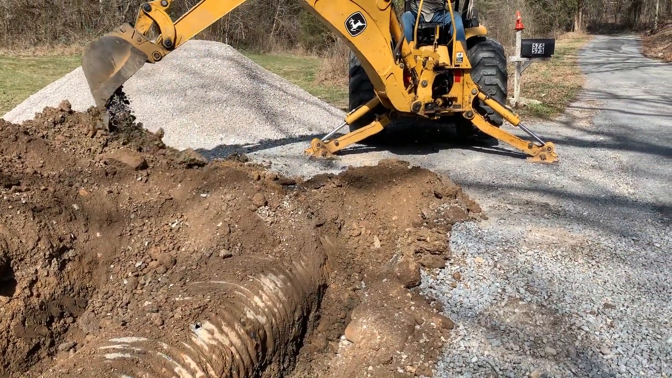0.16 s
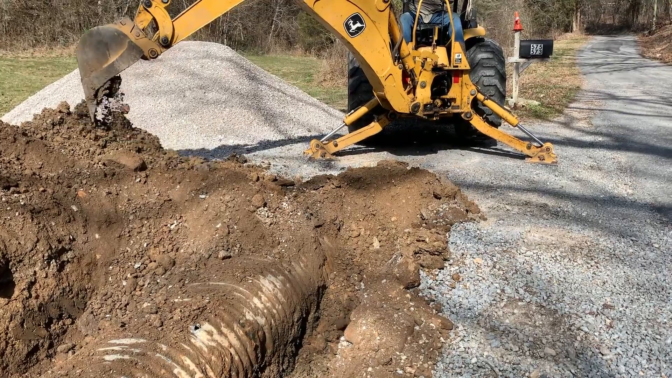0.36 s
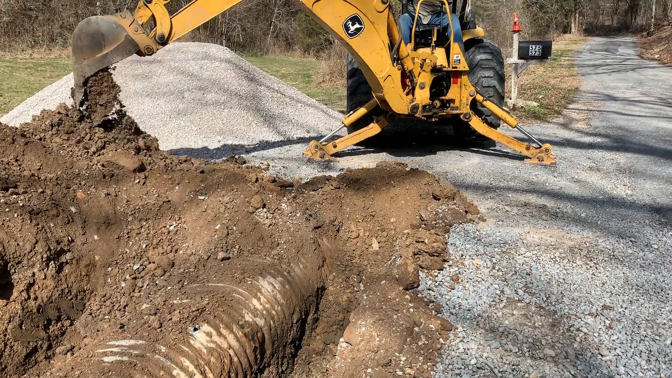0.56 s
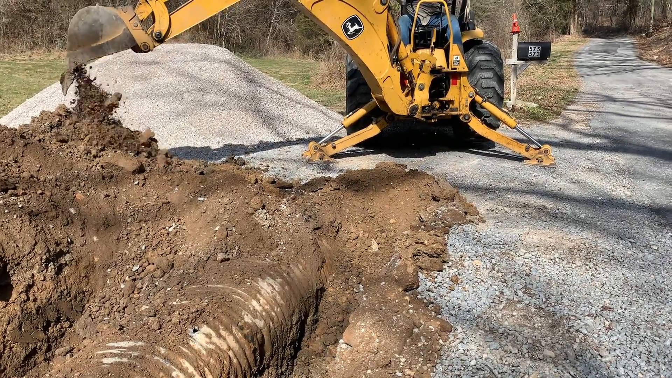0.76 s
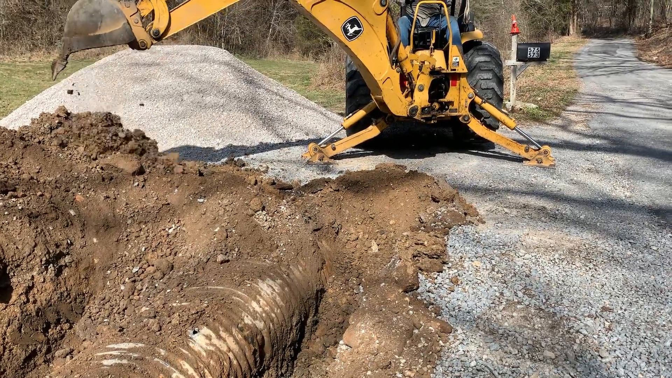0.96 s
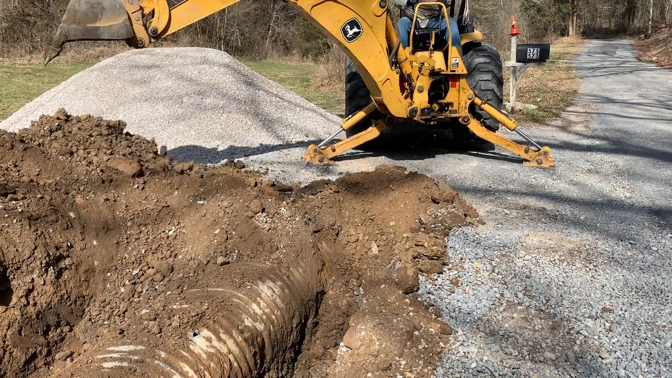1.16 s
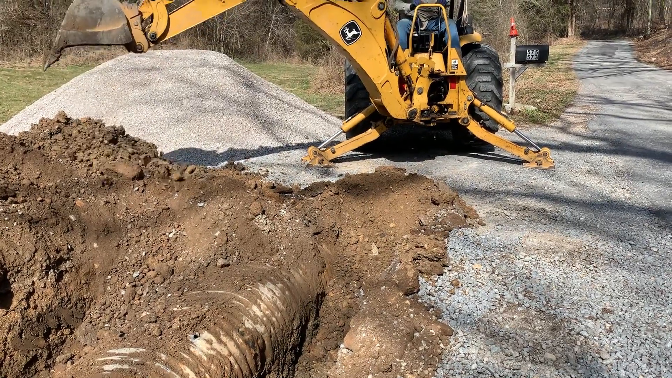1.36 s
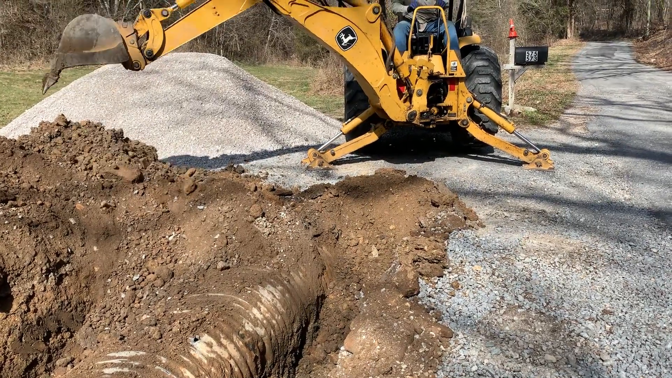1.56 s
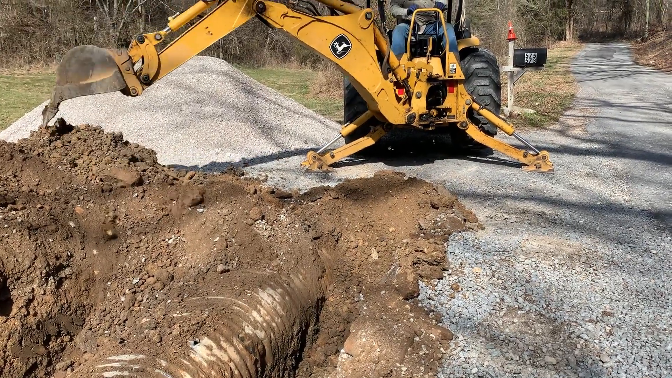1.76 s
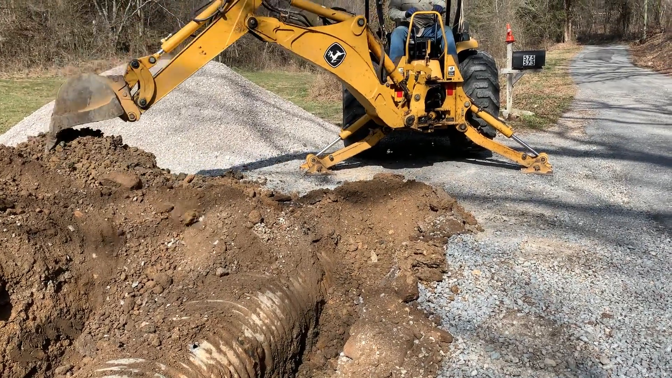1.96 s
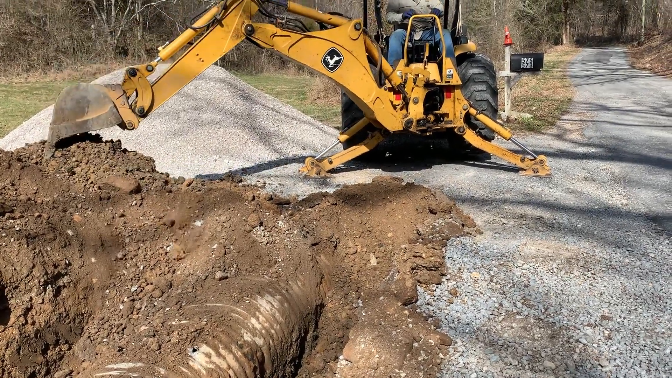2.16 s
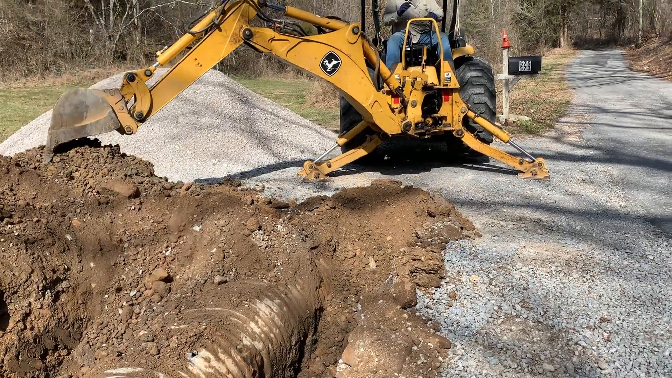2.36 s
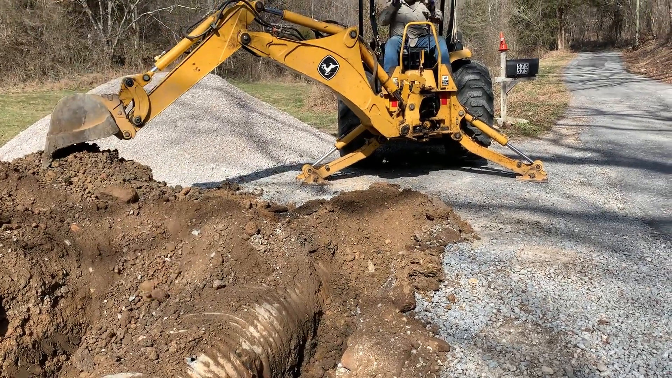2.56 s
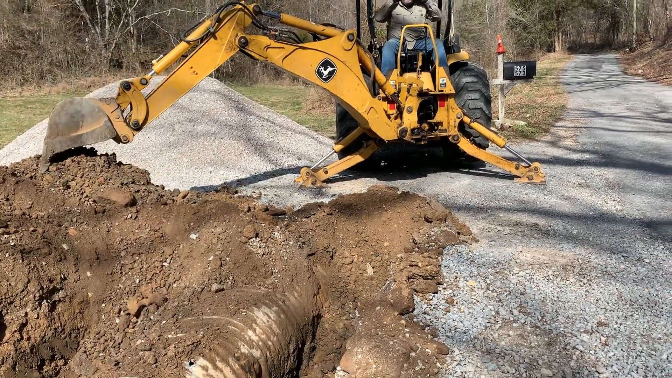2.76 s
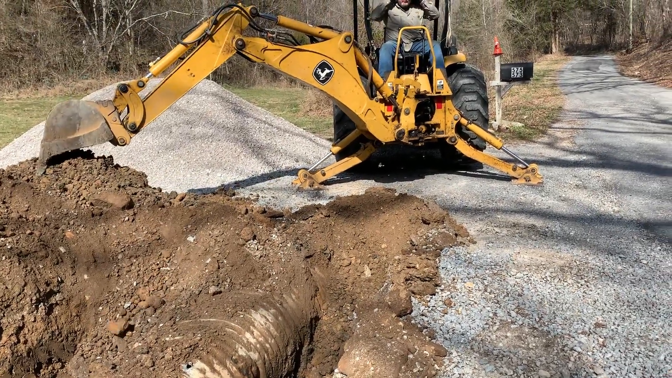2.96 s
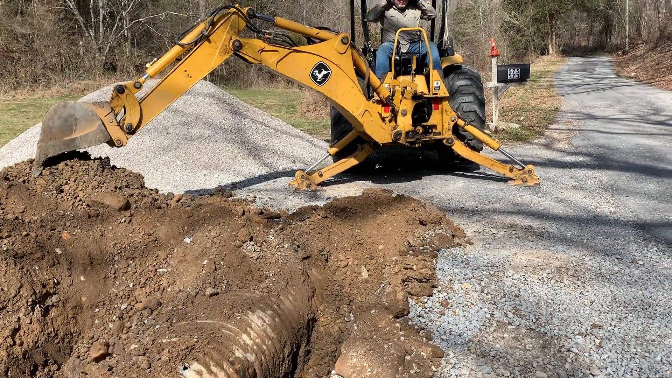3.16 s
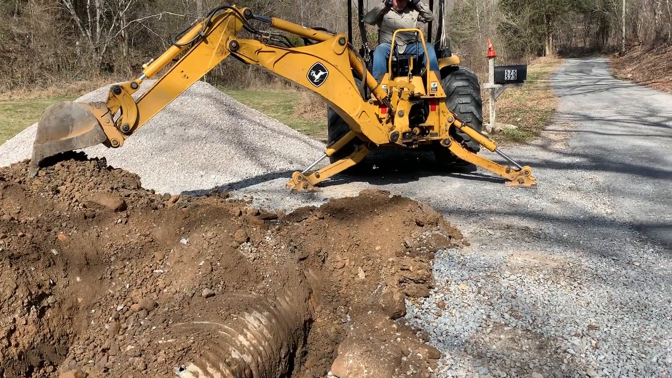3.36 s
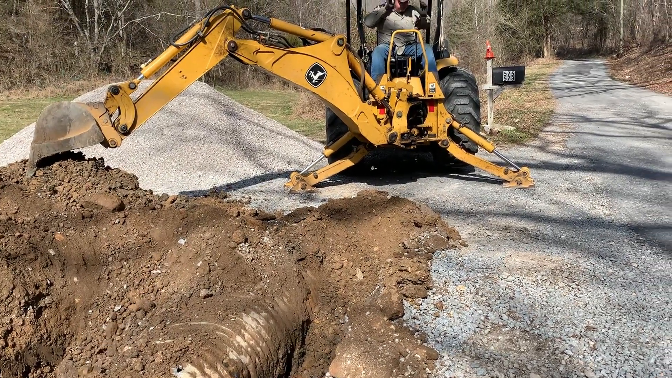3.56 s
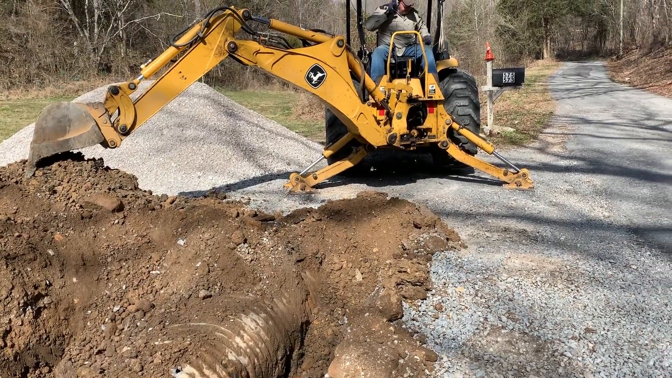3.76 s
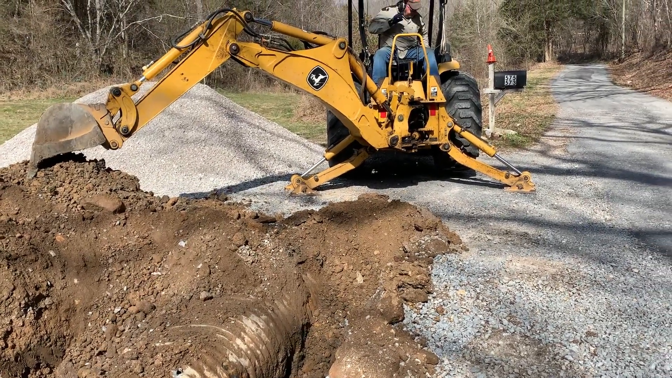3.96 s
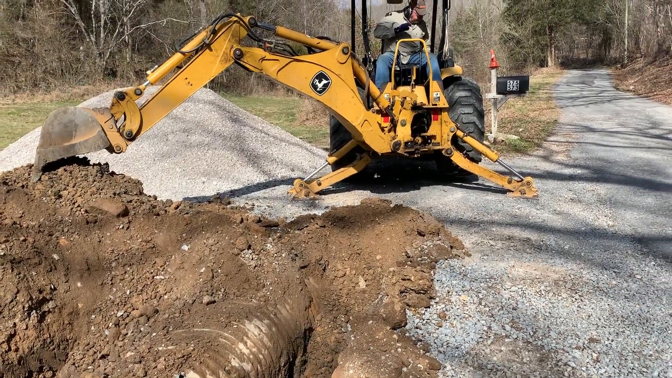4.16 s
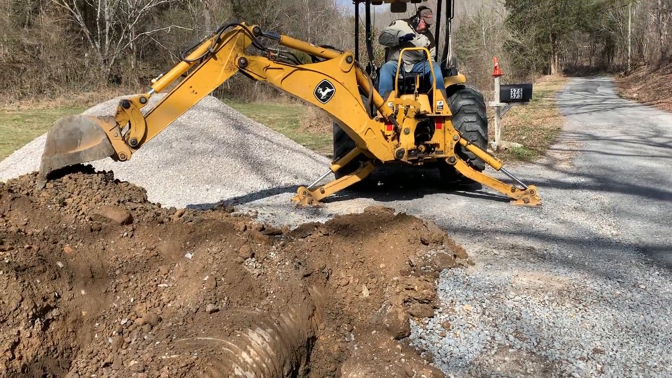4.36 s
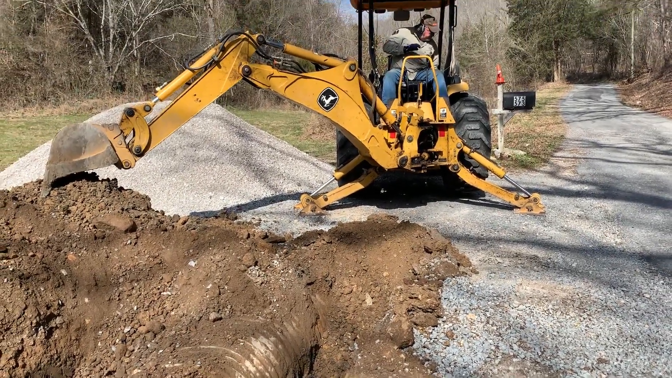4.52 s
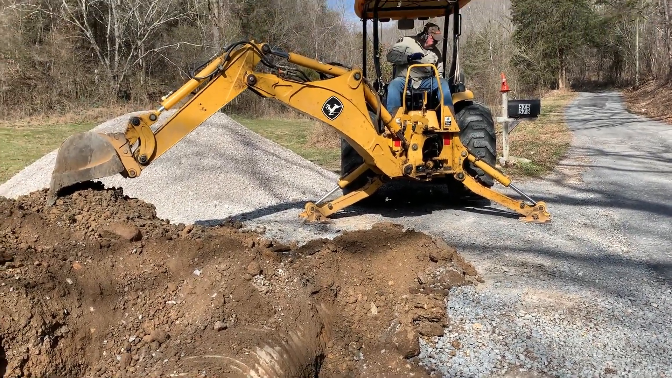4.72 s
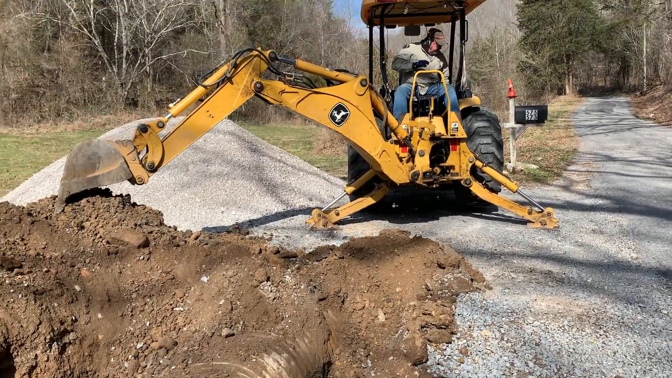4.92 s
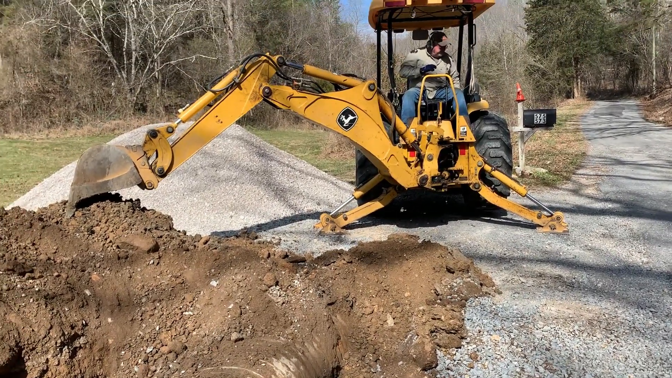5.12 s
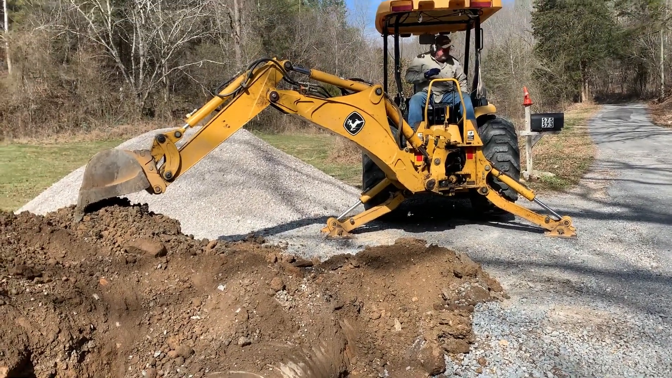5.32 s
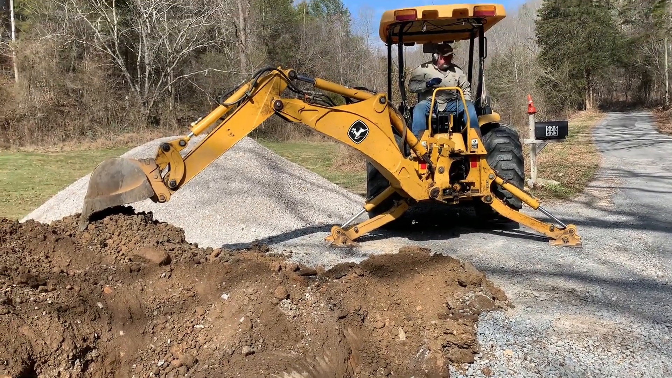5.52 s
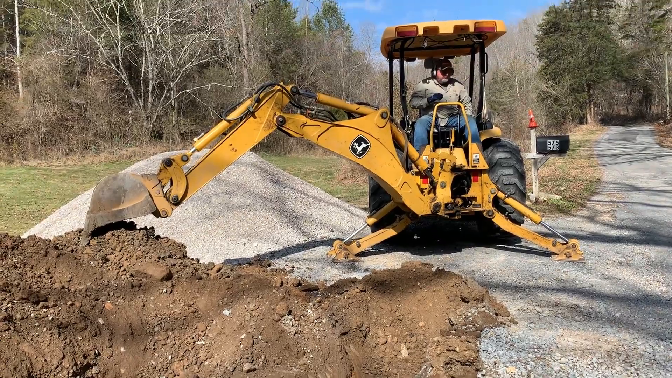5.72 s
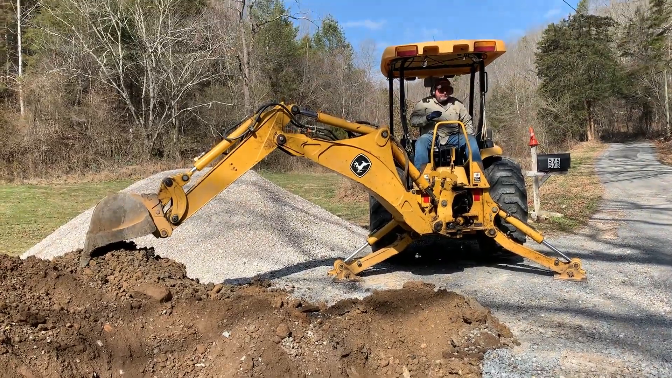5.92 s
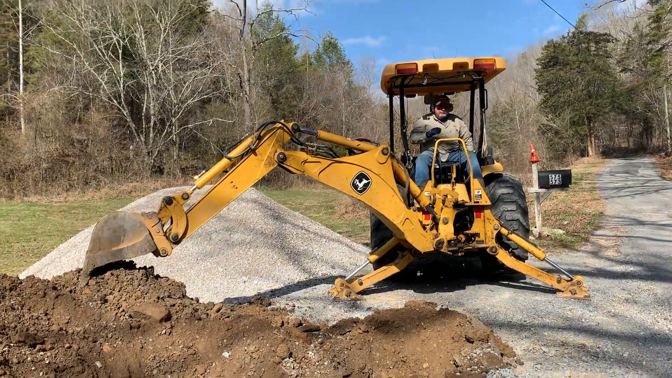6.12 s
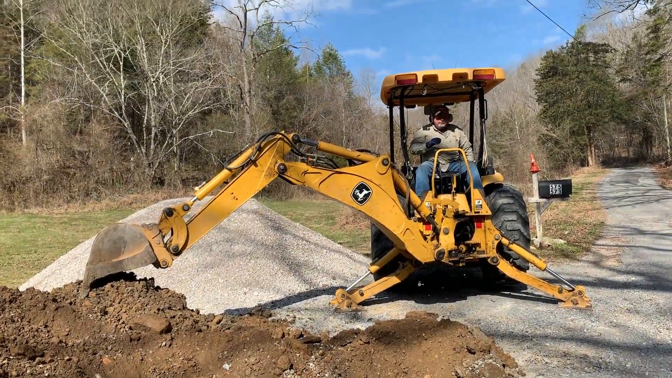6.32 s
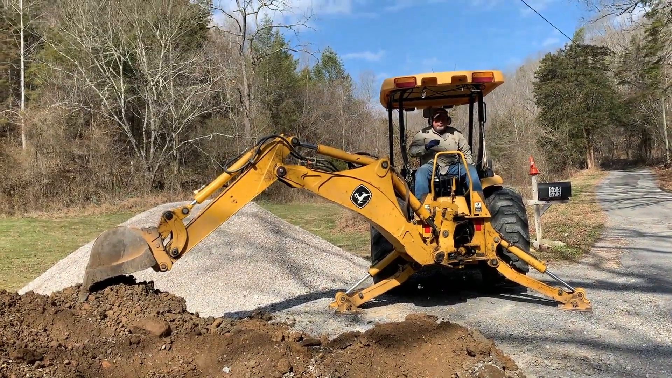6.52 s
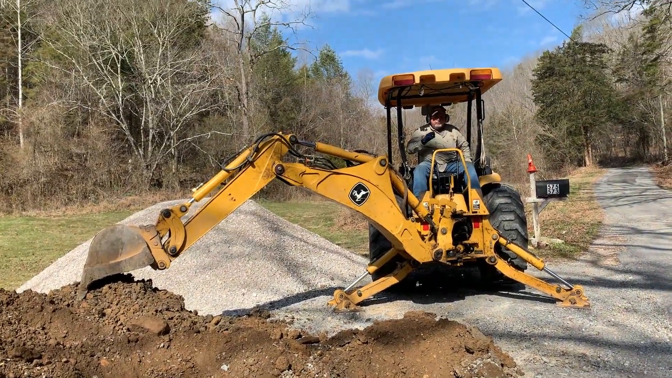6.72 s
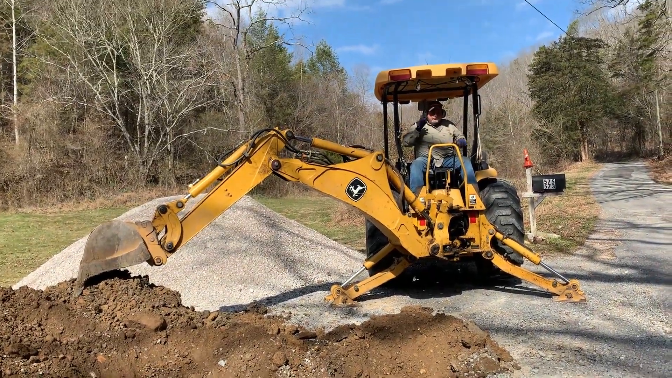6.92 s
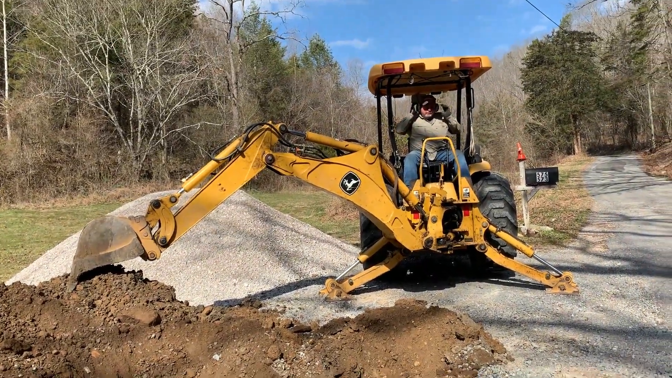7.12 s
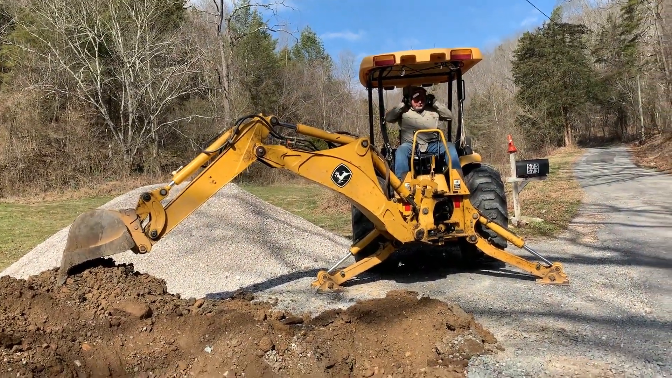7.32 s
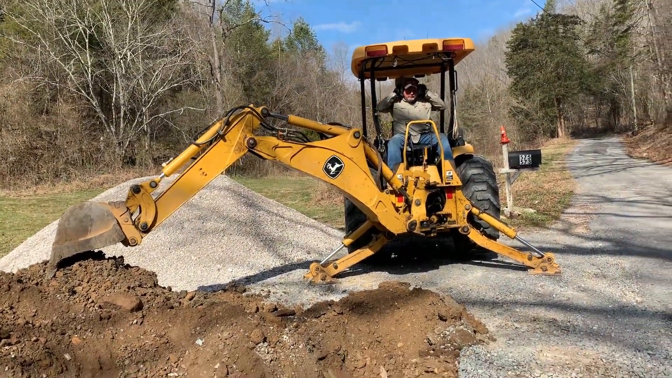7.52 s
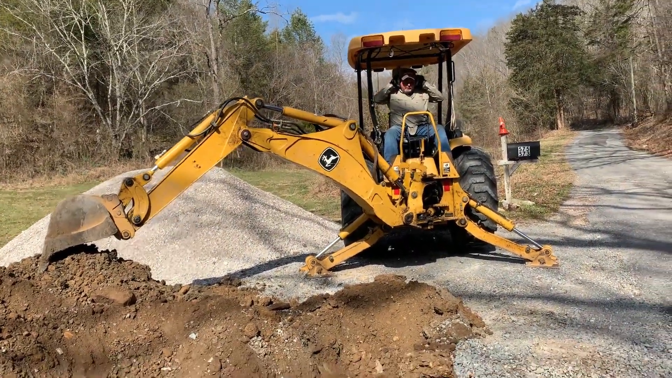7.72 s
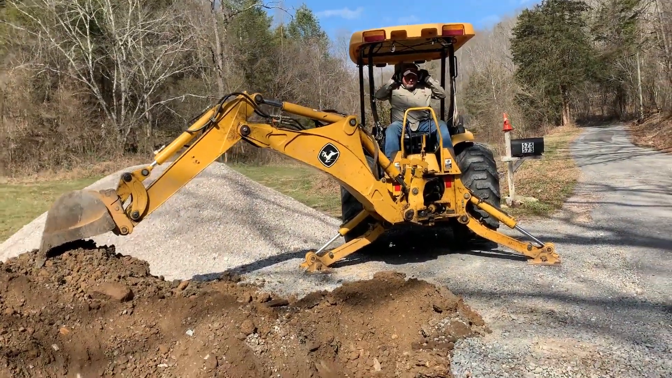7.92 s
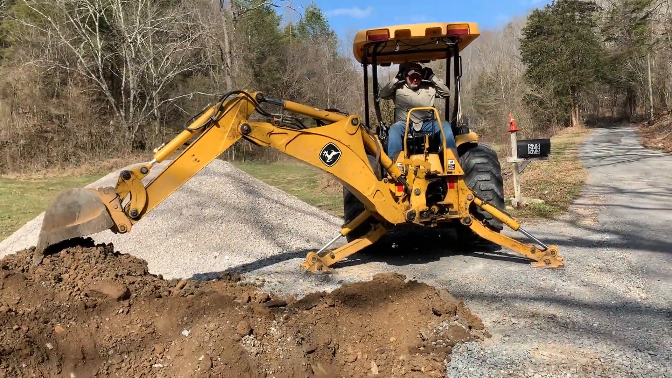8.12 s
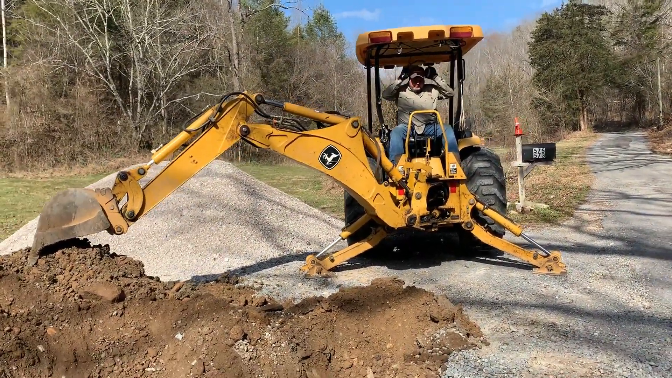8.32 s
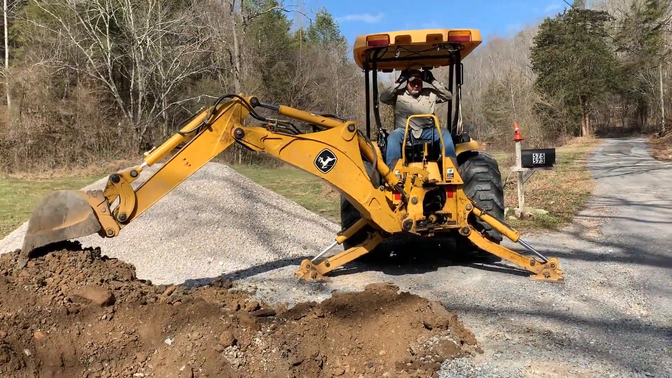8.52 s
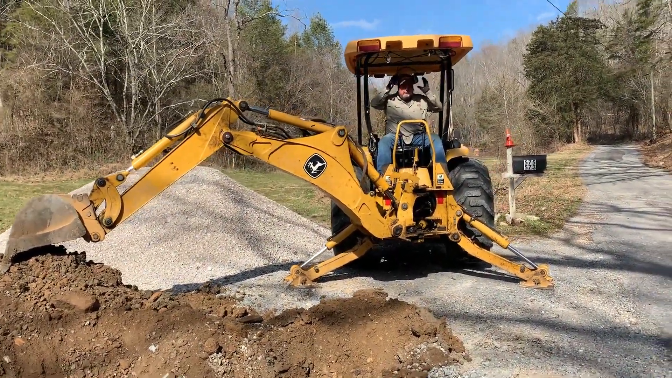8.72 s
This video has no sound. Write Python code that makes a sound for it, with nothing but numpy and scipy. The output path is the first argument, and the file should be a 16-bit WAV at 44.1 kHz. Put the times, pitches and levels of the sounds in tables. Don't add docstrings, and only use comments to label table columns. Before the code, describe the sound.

A four-cylinder diesel digger runs fast a few metres away in the open. Soil slides and stones clack from the bucket, oil hisses, and the steel bucket lands with a dull crunch. The engine drones louder, drops to a clattering one-second idle, is switched off and chugs unevenly to a stop. Quiet outdoor air remains, with low rocking lumps and small metallic ticks. Hand-held stereo microphone.

```python
import sys
import numpy as np
from scipy import signal
from scipy.fft import rfft, irfft, next_fast_len
from scipy.io import wavfile
from scipy.ndimage import uniform_filter1d

SR = 44100
rng = np.random.default_rng(int(sys.argv[2]) if len(sys.argv) > 2 else 0)


def generate_wav(signal):
    frames = np.transpose(np.atleast_2d(signal))
    scaled = np.clip(frames, -1, 1) * 32767
    pcm = np.round(scaled).astype(np.int16)
    wavfile.write(sys.argv[1], SR, pcm)


def attenuation_scalar(level_db):
    decades = np.asarray(level_db, float) / 20
    return 10 ** decades


N = 391608
TIME_S = np.arange(N) / SR

# [time_s, firing_rate_hz]
CRANK_SPEED = [(0, 52.03), (.8, 52.43), (1.2, 52.36), (1.7, 53.14), (2.4, 52.93), (4.54, 52.82),
               (4.85, 44.15), (5.2, 34.95), (5.5, 28.17), (5.8, 30.16), (6.57, 30.08), (6.8, 24.6),
               (7.0, 20.85), (7.55, 9.2), (7.85, 5)]
THROTTLE_SHUT_S, STALL_S = 4.54, 7.08


def rms_one(x):
    return x / np.sqrt(np.mean(x ** 2) + 1e-20)


def in_time(rows):
    s, *columns = np.transpose(rows)
    return [np.interp(TIME_S, s, c) for c in columns]


def at_hz(points, hz):
    table_hz, values = np.array(points)[:, 0], np.array(points)[:, 1]
    return np.interp(np.log(hz + 1e-9), np.log(table_hz), values)


def ramp(s, length):
    return np.clip((TIME_S - s) / length, 0, 1)


def peaks_db(rows, rise_db_per_s, fall_db_per_s):
    curves = []
    for s, db in rows:
        below_db = np.where(TIME_S < s, rise_db_per_s * (s - TIME_S), fall_db_per_s * (TIME_S - s))
        curves.append(db - below_db)
    return np.max(curves, axis=0)


def bursts(rows):
    out = np.zeros(N)
    for s, db, length in rows:
        tail = attenuation_scalar(db - 20 * np.arange(int(3 * length * SR)) / (length * SR))
        at = round(s * SR)
        out[at:at + len(tail)] += tail[:N - at]
    return out


def drift(rate):
    r = np.exp(-80 * np.pi * rate / SR)
    slow = signal.lfilter([1], [1, -2 * r, r * r], rng.standard_normal(N // 40 + 2002))[2000:]
    return np.interp(np.arange(N) / 40, np.arange(len(slow)), rms_one(slow))


def noise():
    return rng.standard_normal((2, N))


def coloured(spectrum, source, low_hz=20, high_hz=16000):
    # [pitch_hz, likeness_0_to_1]
    likeness = [(60, 1), (300, 1), (600, 0.95), (1000, 0.86), (2500, 0.8), (5000, 0.42), (8000, 0.75),
                (13000, 1)]
    size = next_fast_len(N)
    hz = np.arange(size // 2 + 1) * SR / size
    alike = np.clip(at_hz(likeness, hz), 0, 1)
    mid, side = rfft(source, size) * attenuation_scalar(at_hz(spectrum, hz)) * (hz > low_hz) * (hz < high_hz)
    both = np.sqrt(1 + alike) * mid + np.sqrt(1 - alike) * side * [[1], [-1]]
    return rms_one(irfft(both, size)[:, :N])


def resonance(x, hz, width_hz):
    r, w = np.exp(-np.pi * width_hz / SR), 2 * np.pi * hz / SR
    return signal.lfilter([0, np.sin(w)], [1, -2 * r * np.cos(w), r * r], x + 1e-18)


def surroundings():
    # [time_s, level_db]
    quiet = [(7.4, -57), (8.17, -68.5), (8.88, -70.5)]
    # [time_s, level_db]
    rocking = [
        (7.4, -56),
        (7.55, -53),
        (7.66, -55),
        (7.82, -60),
        (7.95, -60),
        (8.15, -59),
        (8.42, -56.5),
    ]
    # [pitch_hz, level_db per Hz]
    air_colour = [(88, -25), (150, -5), (244, 3.5), (446, -5.5), (899, -2.5), (5610, -22.5), (7220, -38),
                  (8500, -36), (11000, -40)]
    lump_colour = [(25, -33), (40, 4.5), (60, 3.0), (110, -7.5), (200, -8.0), (300, -43.5)]     # (Hz, dB per Hz)
    air_db, = in_time(quiet)
    rock_db = np.maximum(-65.5, peaks_db(rocking, 61, 61))
    lumps = ramp(7.1, 0.19) * attenuation_scalar(rock_db) * coloured(lump_colour, noise(), high_hz=11050)
    air = attenuation_scalar(air_db + 1.8 * drift(20)) * coloured(air_colour, noise(), high_hz=11050)
    return lumps + air


def ticks():
    # [start_s, peak_db, pitch_hz, length_s]
    sharp_ticks = [(2.485, -26.5, 1120, 0.011), (7.828, -46.5, 1210, 0.0036), (7.893, -42.5, 1320, 0.0014),
                   (7.942, -50, 800, 0.0015), (7.95, -46, 1580, 0.013), (8.079, -53, 1610, 0.0057),
                   (8.246, -50.5, 1480, 0.0087), (8.531, -39.5, 1560, 0.0023), (8.577, -56, 3000, 0.0076),
                   (8.593, -50.5, 2010, 0.011), (8.712, -64, 1590, 0.0055)]
    # [start_s, peak_db, pitch_hz, width_hz, length_s]
    puffs = [(7.958, -47, 2000, 3500, 0.039), (8.095, -41.5, 1750, 830, 0.045),
             (8.108, -47, 830, 600, 0.051), (8.183, -59, 800, 1200, 0.016), (8.321, -55, 1100, 2800, 0.07),
             (8.33, -63, 1950, 330, 0.043), (8.458, -61, 1800, 500, 0.045), (8.44, -64, 3200, 3000, .05),
             (8.062, -62, 1500, 2000, .02), (8.565, -56, 2740, 2300, 0.086), (8.6, -67, 4250, 1490, .04),
             (7.802, -62, 4000, 1400, 0.022), (8.1, -56.5, 3700, 900, 0.043),
             (8.248, -74, 4500, 2500, 0.018), (8.57, -56, 500, 700, 0.056), (8.575, -56.5, 214, 110, 0.062),
             (8.33, -64, 400, 150, .05), (8.11, -65, 670, 202, 0.055), (8.53, -64, 4000, 600, 0.0043)]
    # [start_s, peak_db, pitch_hz, width_hz, length_s]
    key_clicks = [
        (6.502, -41, 10500, 1800, 0.027),
        (6.503, -51, 13500, 2500, 0.017),
        (6.502, -50, 4700, 1500, .02),
        (8.578, -64, 8500, 900, 0.03),
    ]
    # [start_s, peak_db, pitch_hz, width_hz, length_s]
    plates = [(.34, -42, 315, 25, .12), (1.14, -46, 328, 25, .13), (1.87, -40, 370, 80, .07),
              (1.96, -40, 252, 25, .09), (.243, -46, 603, 80, 0.03), (1.885, -39, 1230, 150, 0.044),
              (1.9, -44, 1090, 120, .03), (1.908, -37, 740, 90, 0.054), (1.925, -43, 724, 110, 0.045),
              (1.97, -46, 1180, 120, 0.027), (2.05, -38, 1080, 110, 0.032), (1.95, -43, 864, 80, 0.11),
              (2.01, -38, 1116, 100, .03), (2.028, -35, 1080, 90, 0.047), (2.026, -31, 620, 110, 0.029),
              (2.028, -31, 805, 110, 0.034), (2.073, -34, 620, 110, 0.032), (2.09, -43, 810, 100, 0.038),
              (2.008, -45, 1750, 120, 0.025), (2.025, -39, 1900, 120, 0.044)]
    # [start_s, peak_db, pitch_hz]
    landings = [
        (.245, -41, 314),
        (0.327, -37, 313),
        (1.131, -40, 305),
        (0.432, -43, 5140),
        (0.515, -34, 5430),
        (0.684, -38, 4360),
        (0.888, -35, 4740),
        (.925, -37.5, 4600),
        (1.256, -37.5, 3040),
        (1.979, -37, 252),
    ]
    sharp = [(s, db, hz, 1100, length) for s, db, hz, length in sharp_ticks]
    stones = [(s, db, hz, 0.61 * hz, 0.043 * np.sqrt(1000 / hz)) for s, db, hz in landings]
    out, white, step = np.zeros(N), rng.standard_normal(N), np.arange(6000)
    for s, db, hz, width_hz, length in sharp + list(puffs) + list(key_clicks) + list(plates) + stones:
        at = round(s * SR)
        fall = attenuation_scalar(-20 * step / (length * SR))
        rise = 1 - np.exp(-step / (0.065 * length * SR))
        rattle = fall * rise * white[at - 6000:at]
        ring = resonance(resonance(rattle, hz, width_hz), hz, width_hz)
        out[at:at + 6000] += (attenuation_scalar(db) * ring / np.max(np.abs(ring)))[:N - at]
    return out


def bucket():
    # [start_s, level_db, length_s]
    thumps = [
        (.24, -38, 0.038),
        (.33, -35.5, 0.028),
        (1.88, -36.5, 0.22),
        (1.92, -46.5, 0.18),
        (2.012, -38, 0.078),
        (2.03, -36, 0.056),
        (2.085, -41, 0.083),
    ]
    # [pitch_hz, level_db per Hz]
    steel_colour = [(180, 13), (250, 19), (320, -2), (390, 13), (470, -32), (610, 4.5), (800, 1), (1090, 3),
                    (1400, -5.5), (1850, -9), (3500, -10.5), (6000, -16)]
    soft = uniform_filter1d(bursts(thumps), size=500, origin=249)
    return soft * attenuation_scalar(1.0 * drift(60)) * coloured(steel_colour, noise(), 183, 7000)


def soil():
    # [time_s, level_db]
    slips = [
        (.518, -51),
        (.686, -55),
        (.924, -45),
    ]
    # [pitch_hz, level_db per Hz]
    soil_colour = [(1470, -33), (2500, -8), (5700, -2), (7120, 1), (9540, -1.5), (11000, -1.0),
                   (11600, -26), (12500, -4), (14700, -11), (15700, -19)]
    # [start_s, peak_db]
    clods = [(0.0734, -38.5), (.103, -41), (.13, -40), (.17, -38), (.193, -39), (0.2154, -35), (.243, -44),
             (.262, -38), (0.3062, -34.5), (.335, -41), (0.354, -33), (0.4344, -33), (.492, -34),
             (0.513, -23), (.6535, -36), (.694, -36), (.757, -36), (.771, -36), (.807, -32.5), (.847, -27),
             (.889, -39), (.9, -37), (.908, -32), (.925, -39), (1.082, -46), (1.191, -42), (1.199, -43),
             (0.503, -25), (0.566, -32), (0.604, -33), (0.636, -37), (0.6833, -45), (0.738, -41),
             (0.9823, -28), (1.046, -33.5), (1.1204, -46), (1.1662, -40), (1.2151, -37), (1.253, -35),
             (1.346, -43), (2.2593, -39), (2.4867, -35.5), (2.636, -42), (2.8015, -41), (3.091, -40.5),
             (3.31, -39), (3.451, -32), (3.5965, -40)]
    # [pitch_hz, level_db per Hz]
    grit_colour = [(2500, -14), (5600, -3.5), (7100, -6), (8200, -0.5), (10900, -2.0), (11600, -24),
                   (12600, -9), (15500, -17)]
    trickle_db = peaks_db([(0.73, -53.5)], 13.5, 13.5)
    level_db = np.maximum(trickle_db, peaks_db(slips, 91, 703))
    empty_s, grains_per_s = 1.4, 500
    sliding = TIME_S < empty_s
    sizes = attenuation_scalar(1.2 * np.minimum(rng.exponential(1, (2, N)), 5)) * rng.choice([-1, 1], (2, N))
    grains = sizes * (rng.random(N) < grains_per_s * attenuation_scalar(4 * drift(60)) / SR)
    slide = sliding * attenuation_scalar(level_db + 5.5) * coloured(soil_colour, grains, 2500, 15500)
    spits = bursts([(s, db - 8.0, .008) for s, db in clods])
    return slide + spits * coloured(grit_colour, noise(), 2100, 15500)


def valve():
    # [opens_s, shuts_s, opening_db, shutting_db, top_octave_db]
    openings = [
        (0.102, .22, -57, -59, -7),
        (.55, 0.87, -64, -48, -8.5),
        (1.37, 2.02, -56.5, -49, -9.5),
    ]
    # [pitch_hz, level_db per Hz]
    hiss_colour = [(4290, -49), (7300, -9), (7940, -2.5), (9260, -3), (9840, -8), (10000, -5), (10900, -5),
                   (11300, -19), (12300, -11), (15700, -25)]
    rate, = in_time(CRANK_SPEED)
    level = attenuation_scalar(-63 - 8.5 * ramp(THROTTLE_SHUT_S, 0.071) + 6 * np.log2(rate / rate[0]))
    top = np.hypot(level * attenuation_scalar(-15), attenuation_scalar(-90))
    for opens, shuts, first_db, last_db, top_db in openings:
        open_db = np.interp(TIME_S, [opens, shuts], [first_db, last_db])
        before_db = 140 * np.maximum(opens - TIME_S, 0)
        after_db = 75 * np.maximum(TIME_S - shuts, 0)
        flow = attenuation_scalar(open_db - before_db - after_db)
        level, top = np.hypot(level, flow), np.hypot(top, flow * attenuation_scalar(top_db))
    white = noise()
    hiss = level * coloured(hiss_colour, white, 7250, 11050) + top * coloured(hiss_colour, white, 12350, 15300)
    unloaded = rms_one(resonance(resonance(white, 8150, 700), 8150, 700))
    hiss += level * attenuation_scalar(-0.5) * ramp(THROTTLE_SHUT_S, 0.2) * unloaded
    cracked = ramp(openings[-1][0], 0.019) - ramp(openings[-1][1], 0.24)
    whistle = rms_one(resonance(resonance(white[0], 9540, 80), 9540, 80))
    return attenuation_scalar(-1.0 + 1.4 * drift(31)) * (hiss + attenuation_scalar(-6.0) * level * cracked * whistle)


def whine(rate, db):
    # [pitch_hz, level_db]
    pump_tones = [(1480, -68), (1615, -68), (2234, -61.5), (2536, -70), (2988, -70.5), (3596, -72),
                  (5394, -73), (6024, -72)]
    # [pitch_hz, level_db]
    gear_tones = [(581, -58.5), (661, -65.5), (714, -65.5), (793, -65), (952, -65)]
    seconds_at_full_speed = np.cumsum(rate / 52.9) / SR
    out = 0
    for hz, line_db in list(pump_tones) + list(gear_tones):
        level = attenuation_scalar(line_db + db + 2.3 * drift(4.6)) * np.sqrt(2)
        out = out + level * np.sin(2 * np.pi * (hz * seconds_at_full_speed + 0.16 * drift(5.9)))
    return out


def knocks(contacts, turn, load, first_s, last_s, spread_db, jitter_s):
    first, last = int(first_s * SR), int(last_s * SR)
    cycles = np.arange(int(turn[first] / 4), int(turn[last] / 4) + 1)
    out = np.zeros(N)
    for firing, hz, *db in contacts:
        jitter = (jitter_s * SR * rng.standard_normal(len(cycles))).astype(int)
        at = np.searchsorted(turn, 4 * cycles + firing) + jitter
        at = at[(at >= first) & (at < last)]
        tilt_db = 1.5 * np.log2(min(hz, 2000) / 1500)
        blow_db = tilt_db + db[0] + (db[-1] - db[0]) * load[at]
        clicks = np.zeros(last - first)
        clicks[at - first] = attenuation_scalar(blow_db + spread_db * rng.standard_normal(len(at)))
        width_hz = max(.065 * hz, 80)
        struck = resonance(clicks, hz, 3.0 * width_hz) * 6.0 * width_hz / SR
        out[first:last] += resonance(struck, hz, width_hz)
    return out


def block_knocks(turn, shut, caught, idle_db):
    # [position_firings, pitch_hz, light_load_db, full_load_db]
    loaded = [(0.07, 620, -7, -6), (0.47, 2260, -10, -7), (0.47, 3470, -17, -12), (0.55, 1960, -4, -7),
              (0.59, 920, -9, -6), (0.75, 620, -8, -5), (0.83, 3600, -14, -14), (1.19, 1580, -12, -10),
              (1.23, 720, -10, -7), (1.23, 1960, -12, -9), (1.35, 1140, -11, -9), (1.51, 3470, -17, -10),
              (1.59, 1270, -9, -8), (1.59, 2600, -14, -11), (1.71, 2030, -3, -10), (1.83, 1690, -8, -5),
              (1.91, 770, -4, -6), (1.95, 3600, -10, -12), (1.99, 2900, -9, -9), (2.03, 640, -5, -7),
              (2.03, 4150, -16, -11), (2.15, 830, -7, -5), (2.31, 560, -8, -6), (2.39, 3010, -16, -12),
              (2.43, 920, -7, -2), (2.43, 1180, -9, -9), (2.51, 2600, -12, -6), (2.51, 3600, -13, -12),
              (2.59, 4000, -11, -13), (2.71, 2510, -12, -7), (2.79, 3010, -8, -9), (2.83, 1890, -1, 2),
              (2.83, 3600, -11, -14), (2.95, 860, -10, -8), (3.03, 560, -6, -5), (3.03, 4150, -15, -12),
              (3.15, 1820, -6, -2), (3.19, 760, -11, -8), (3.35, 990, -10, -9), (3.55, 2100, -5, -2),
              (3.63, 3600, -16, -10), (3.83, 1760, -9, -11), (3.83, 4300, -14, -17), (3.91, 1140, 0, -1)]
    # [position_firings, pitch_hz, light_load_db, full_load_db]
    strong_knock = [
        (2.52, 1810, 1, 1),
    ]
    # [position_firings, pitch_hz, level_db]
    idling = [(0.14, 1890, 0), (0.18, 2510, -9), (0.26, 1140, 0), (0.38, 3350, -15), (0.38, 4150, -16),
              (1.02, 2340, -5), (1.06, 2900, -14), (1.06, 3470, -17), (1.1, 1890, -4), (1.18, 4000, -14),
              (1.34, 690, -8), (1.34, 3010, -14), (1.38, 1820, -8), (1.38, 2260, -11), (1.5, 1370, -13),
              (1.5, 3730, -17), (1.54, 1140, -10), (1.66, 2180, -12), (1.7, 860, -7), (1.9, 580, -8),
              (2.02, 3230, -12), (2.06, 830, -9), (2.14, 1180, -11), (2.14, 1370, -9), (2.18, 1890, -2),
              (2.18, 3860, -14), (2.26, 3120, -11), (2.34, 2700, -7), (2.42, 3350, -9), (2.46, 1100, -8),
              (2.46, 1690, -6), (2.62, 2260, -10), (2.62, 2600, -12), (3.1, 2900, -6), (3.1, 4300, -12),
              (3.14, 1820, 5), (3.18, 800, -2), (3.22, 2510, -5), (3.22, 3730, -11), (3.26, 2180, -2),
              (3.34, 960, -9), (3.42, 3730, -12), (3.62, 2260, -6), (3.66, 1760, -6), (0.05, 8500, -19),
              (1.1, 8500, -21), (2.2, 8500, -19), (3.13, 8500, -14), (3.14, 9800, -20)]
    echo_s = [.0059, .0073]
    load = ramp(1.2, 2.2)
    hits = attenuation_scalar(18 - 7 * shut - 30 * ramp(THROTTLE_SHUT_S, .6)) * knocks(
        list(loaded) + list(strong_knock), turn + .12, load, 0, 5.1, spread_db=1.0, jitter_s=.00006)
    hits += attenuation_scalar(idle_db + 21.5) * knocks(
        idling, turn + .06, caught, 5.3, 6.8, spread_db=1.5, jitter_s=.0003)
    return hits + attenuation_scalar(-7) * np.array([np.roll(hits, round(s * SR)) for s in echo_s])


def exhaust(rate, turn, level_db, load_db, unfired, coasting):
    # [pitch_hz, level_db]
    pipe = [(20, -40), (30, -15), (33, -8), (39, -1), (52, 2), (62, -1), (72, -3), (90, -1), (108, -5),
            (122, -8), (145, -10.5), (165, -10), (185, -15), (215, -27), (300, -38), (400, -62)]
    # [pitch_hz, level_db]
    coasting_pipe = [(28, 7), (36, 0.0), (52, -1.0), (90, 1), (103, -3.5), (122, 8), (150, 7), (175, 10),
                     (200, 5), (220, 12), (250, 7), (300, -4)]
    low_orders_db = [1, 1.0, 5, -6.5]
    cylinder_db = [-0.32, -0.23, 0.72, -0.56]
    # [multiple_of_firing_rate, level_db]
    uneven_orders = [(1.75, -24), (2.75, -22)]
    # [pitch_hz, level_db per Hz]
    rumble_colour = [(42, -40), (58, -4), (70, -5), (100, -5), (170, -1.5), (200, -3.5), (230, -14.5)]
    slow = np.arange(0, N, 64)
    unfired_slow, stalled = unfired[slow], ramp(STALL_S, .03)[slow]
    lag = .25 * (ramp(THROTTLE_SHUT_S, .06) - ramp(THROTTLE_SHUT_S + .13, .25))[slow]
    order_db = list(low_orders_db) + [0] * 12
    out, power = [0, 0], 0
    for k in range(1, 17):
        hz = k * rate[slow]
        lead = .4 / (1 + (hz / 44) ** 8) + .19 / (1 + (103 / hz) ** 12) - .08 - (k > 1) * lag
        gain_db = order_db[k - 1] * attenuation_scalar(load_db[slow]) + at_hz(coasting_pipe, hz) * coasting
        gain_db = gain_db - 6 * unfired_slow * np.log2(1 + hz / 100)
        gain_db = gain_db - 5.5 * stalled * np.log2(1 + hz / 50)
        twin = 1 + 1.9 * unfired_slow * np.exp(2j * np.pi * hz * 0.00865)
        order = attenuation_scalar(at_hz(pipe, hz) + gain_db) * np.exp(2j * np.pi * lead) * twin
        power = power + np.abs(order) ** 2 / 2
        wave = np.exp(2j * np.pi * k * (turn + .25))
        out[k > 1] = out[k > 1] + np.real(np.interp(np.arange(N), slow, order) * wave)
    firings = np.arange(int(turn[-1]) + 2)
    chance = np.interp(turn, firings - .25, rng.standard_normal(len(firings)))
    firing_db = np.interp(turn, firings - .25, np.resize(cylinder_db, len(firings)))
    strength = attenuation_scalar(firing_db + (0.3 + 2.5 * unfired) * chance)
    puffing = (out[0] + strength * out[1]) / np.interp(np.arange(N), slow, np.sqrt(power))
    blades = attenuation_scalar(-20.5 + load_db + 3.0 * drift(3.4)) * np.sqrt(2) * np.sin(7 * np.pi * turn)
    for k, db in uneven_orders:
        blades += attenuation_scalar(db + load_db + 1.3 * drift(2.6)) * np.sqrt(2) * np.sin(2 * np.pi * k * turn)
    rumble = attenuation_scalar(-16.0 + 7.1 * unfired + 1.4 * drift(5.4)) * coloured(rumble_colour, noise(), high_hz=230)
    return attenuation_scalar(level_db) * (puffing + blades + rumble)


def last_compressions(block, fan):
    # [start_s, peak_db]
    chugs = [(6.618, -45), (6.69, -46), (6.766, -44), (6.845, -40), (6.941, -41), (7.042, -40),
             (7.146, -40), (7.274, -44), (7.35, -47), (7.427, -44), (7.517, -47), (7.587, -50),
             (7.645, -46), (7.734, -50), (7.8, -51), (7.887, -52), (7.925, -56), (7.955, -50), (8.06, -57),
             (8.25, -57)]
    jolts = uniform_filter1d(bursts([(s, db - 14, .045) for s, db in chugs]), size=500)
    return jolts * (attenuation_scalar(-3) * block + fan)


def engine():
    # [time_s, level_db]
    shaking = [(0, -48), (1.8, -46), (3.1, -44), (4.4, -42.5), (4.7, -47), (5.17, -49.5), (5.5, -48.5),
               (5.72, -47), (6.53, -48.5), (7.35, -61.5), (8.0, -83)]
    # [pitch_hz, level_db per Hz]
    block_colour = [(280, -47), (480, -22), (571, -6.5), (627, -4), (684, -14), (746, -12.5), (802, -3.5),
                    (1150, -4.5), (1260, -11.5), (1850, -4), (2300, -7.5), (2410, -16), (2530, -5),
                    (2700, -14.5), (3510, -42), (5940, -120)]
    # [pitch_hz, level_db per Hz]
    fan_colour = [(1590, -32), (2700, 1), (2760, -3), (3060, -0.5), (3310, -5.5), (3570, -4), (4270, -3.5),
                  (6210, -13), (7300, -17), (9490, -53), (16100, -120)]
    # [pitch_hz, level_db per Hz]
    growl_colour = [(120, -31), (200, -14), (227, -3), (268, -7), (334, -14.5), (398, -11), (449, -40),
                    (480, -27), (620, -59), (1060, -120)]
    (rate,), (clatter_db,) = in_time(CRANK_SPEED), in_time(shaking)
    turn = np.cumsum(rate) / SR
    running = np.clip((7.85 - TIME_S) / 0.46, 0, 1)
    idle_catch_s, key_off_s = 5.48, 6.56
    shut, caught, off = ramp(THROTTLE_SHUT_S, .08), ramp(idle_catch_s, .05), ramp(key_off_s, .07)
    fuelled, unfired = 1 - shut + caught - off, 0.31 * off
    overrun = shut * (1 - caught) * (1 - ramp(THROTTLE_SHUT_S, 0.99))

    to_go_s = np.maximum(THROTTLE_SHUT_S - TIME_S, 0)
    load_db, idle_db = -2.0 - 0.14 * to_go_s - 50 * shut, -45 * (1 - caught + off)
    whine_db = 5 - 2.5 * to_go_s - 3.3 * shut - 40 * ramp(THROTTLE_SHUT_S, 1.4)
    exhaust_db = -22 - 1.75 * to_go_s - 2 * (1 - fuelled) + 11.5 * np.log2(rate / rate[0])
    exhaust_db += -2 * (ramp(STALL_S, 0.017) - ramp(7.35, 0.097))
    growl_db = -47.5 - 5 * caught + clatter_db + 45.5
    fan_db = -54 + 0.97 * (clatter_db + 45)

    share, angle = .3 * fuelled, (turn / 2 % 1 * 1650).astype(int)
    rattle = np.sqrt(1 - share) * noise() + np.sqrt(share) * noise()[:, angle]
    block = attenuation_scalar(1.1 * drift(30)) * coloured(block_colour, rattle, 480, 2700)
    fan = attenuation_scalar(1.5 * drift(40)) * coloured(fan_colour, rattle, 2700, 7250)
    growl = attenuation_scalar(growl_db + 0.97 * drift(60)) * coloured(growl_colour, rattle, 200, 480)

    beat = np.cos(2 * np.pi * (turn - .2))
    block_db = -3.5 - 2.2 * fuelled + 1.6 * shut - 4.0 * off + 1.5 * beat
    clatter = attenuation_scalar(clatter_db) * (block_knocks(turn, shut, caught, idle_db) + attenuation_scalar(block_db) * block)
    air = attenuation_scalar(fan_db - 1.0 * fuelled + (2.0 + 1.4 * attenuation_scalar(idle_db)) * beat) * fan
    hum_db = -51 - 45 * off - 9 * (TIME_S - idle_catch_s) + 1.0 * drift(4.9)
    growl += ramp(idle_catch_s - .1, 0.084) * attenuation_scalar(hum_db) * np.sin(2 * np.pi * 13 * turn)
    panel_ring = rms_one(resonance(resonance(rattle[0], 388, 55), 388, 55))
    growl += shut * attenuation_scalar(clatter_db - 10.5 + 9.5 * overrun) * panel_ring
    puffing = exhaust(rate, turn, exhaust_db, load_db, unfired, (shut - caught)[::64])
    turning = puffing + growl + clatter + air + whine(rate, whine_db)
    return running * turning + last_compressions(block, fan)


def scene():
    return surroundings() + ticks() + bucket() + soil() + valve() + engine()


def top_cut(x):
    return signal.sosfilt(signal.butter(12, 15880, fs=SR, output="sos"), x)


def record(dry):
    # [pitch_hz, level_db]
    left_db = [(60, 0), (110, 1.5), (200, -1), (380, 1.5), (700, -4), (1290, -3), (2380, -1.5),
               (4400, -4.5), (8120, 0), (15000, 0)]
    # [pitch_hz, phase_rad]
    left_lead = [(40, 0.28), (250, 0.59), (400, 0.72), (1030, 1.1), (1550, 0.17), (3010, 1), (3620, 0.5),
                 (4910, 0.55), (8960, -5.5), (11100, -9), (13200, -11), (15400, -14.5)]
    size = next_fast_len(N + 2000)
    hz = np.arange(size // 2 + 1) * SR / size
    half = attenuation_scalar(at_hz(left_db, hz) / 2) * np.exp(.5j * at_hz(left_lead, hz))
    ports = irfft(rfft(dry, size) * [half, 1 / half], size)[:, :N]
    return top_cut(ports)


dry = scene()
out = record(dry)
generate_wav(out)
```